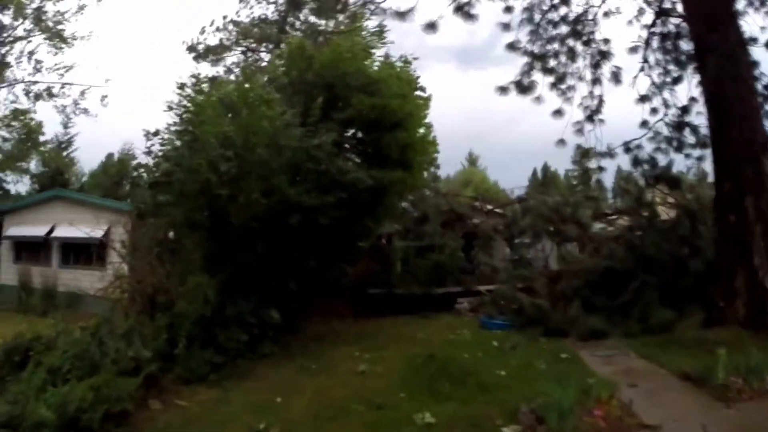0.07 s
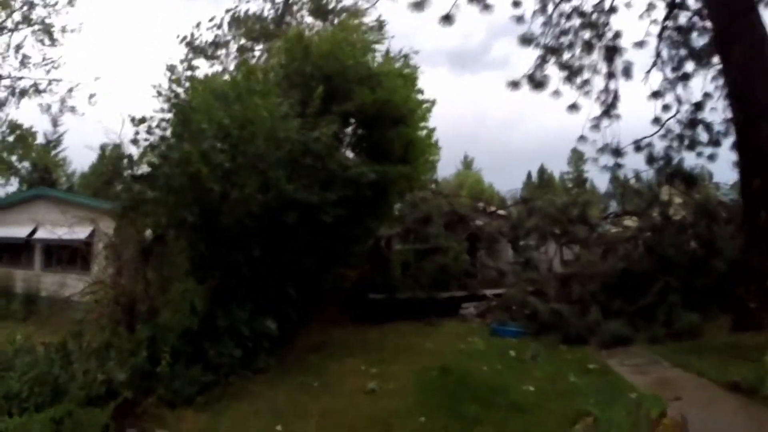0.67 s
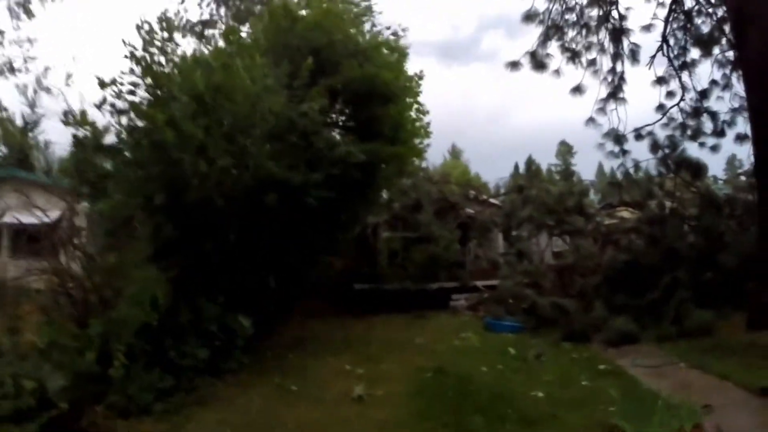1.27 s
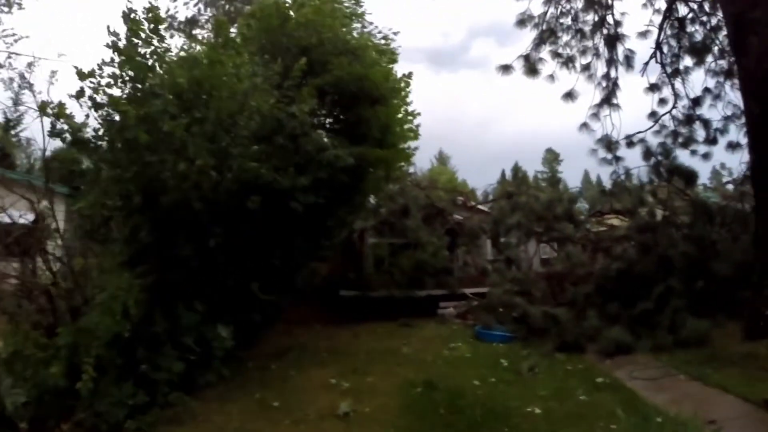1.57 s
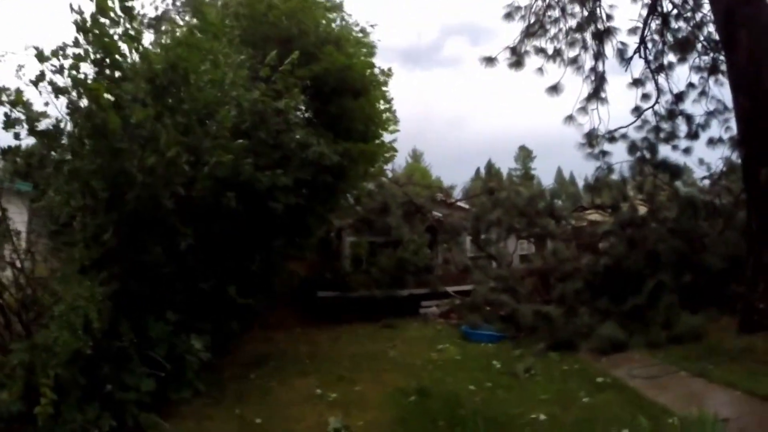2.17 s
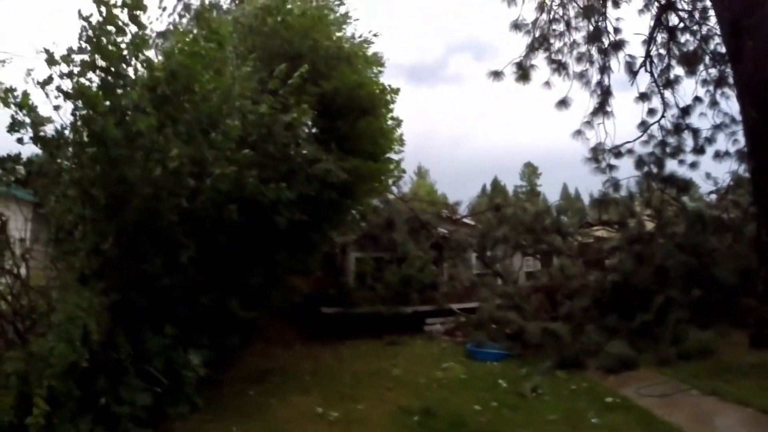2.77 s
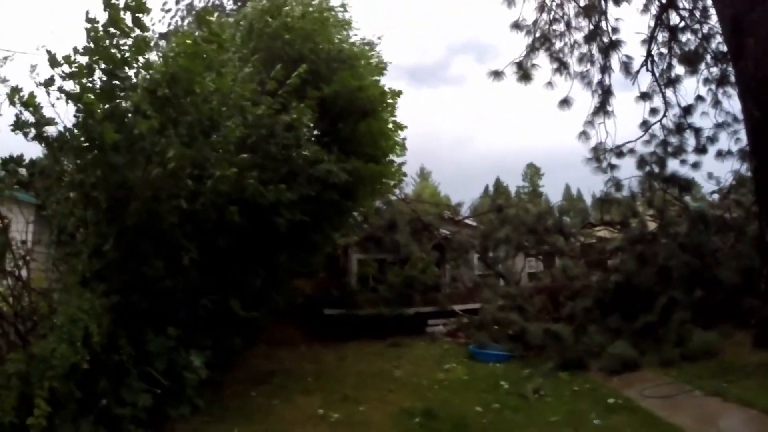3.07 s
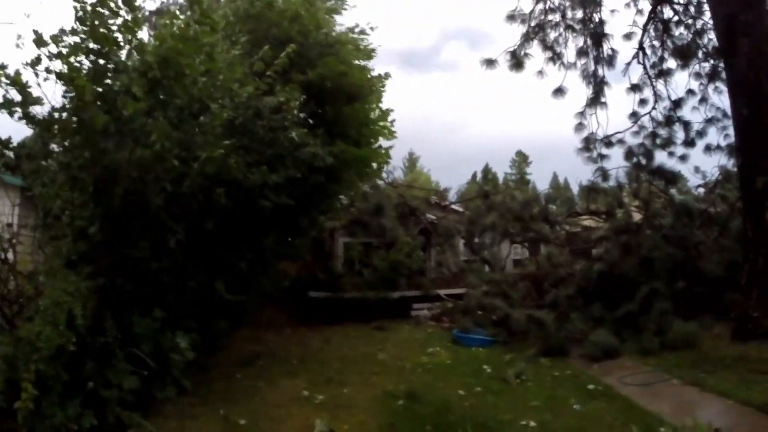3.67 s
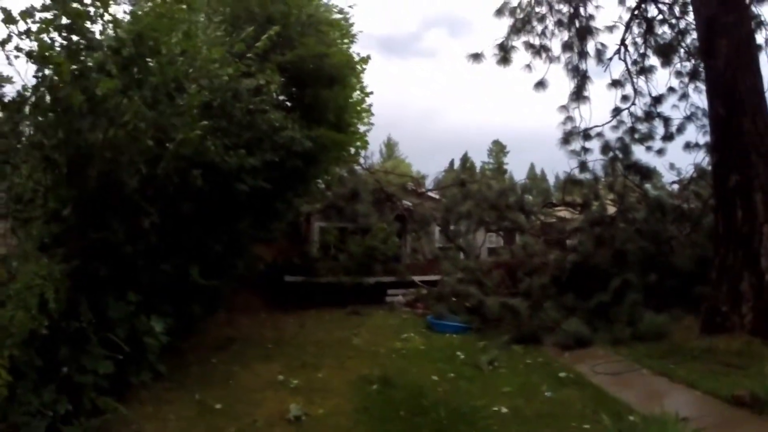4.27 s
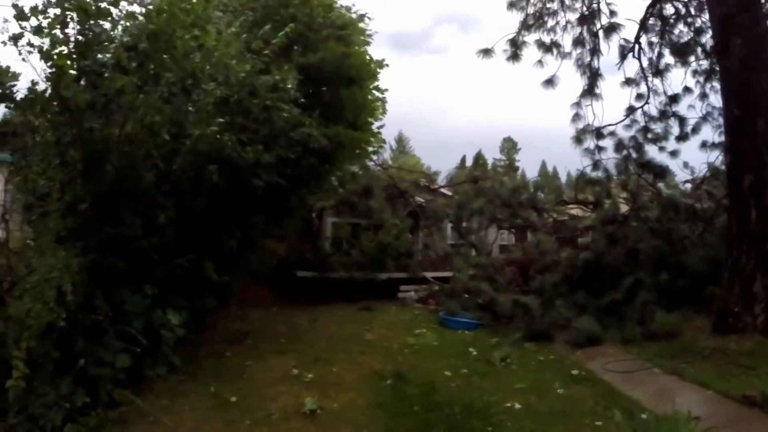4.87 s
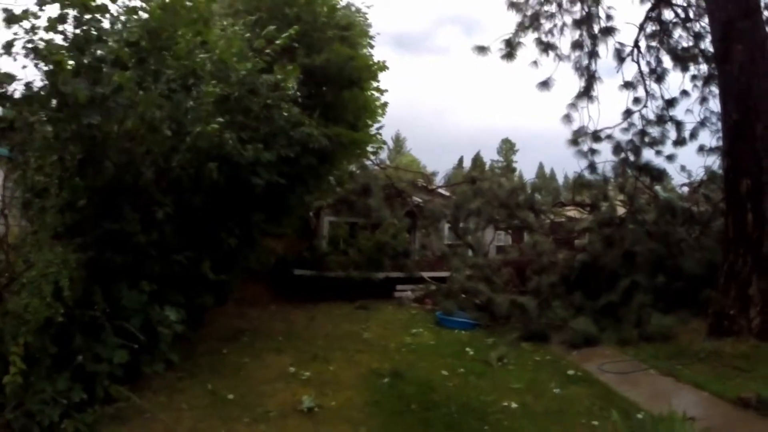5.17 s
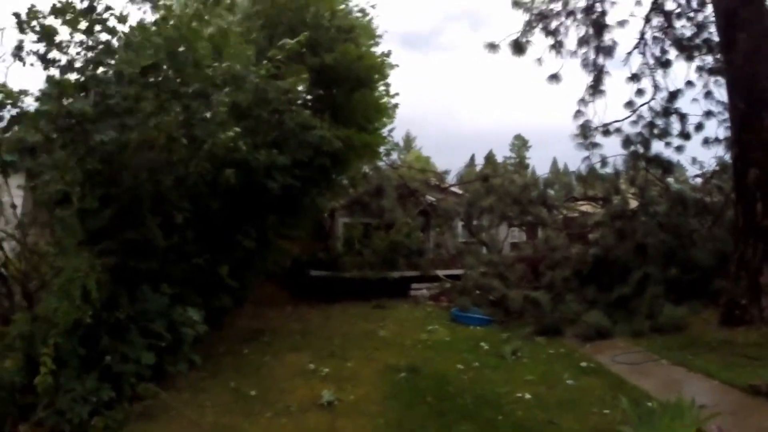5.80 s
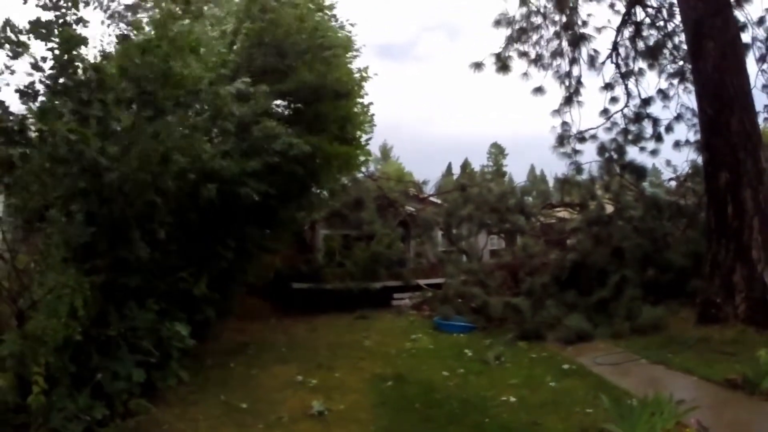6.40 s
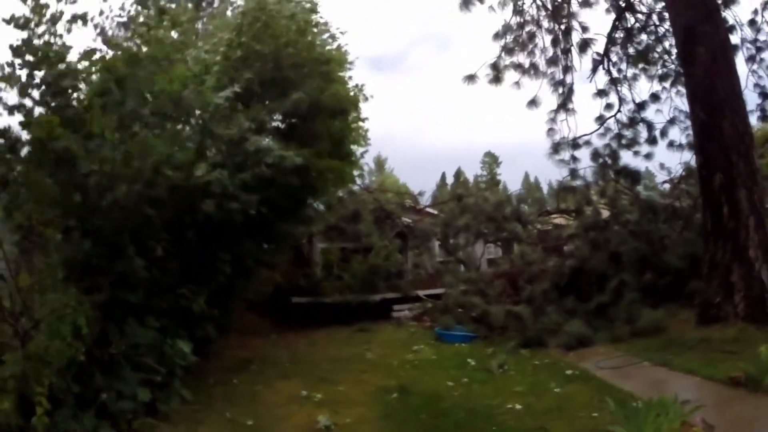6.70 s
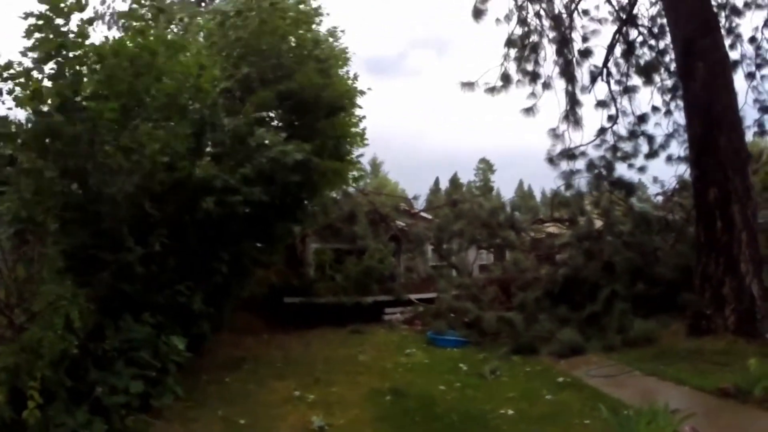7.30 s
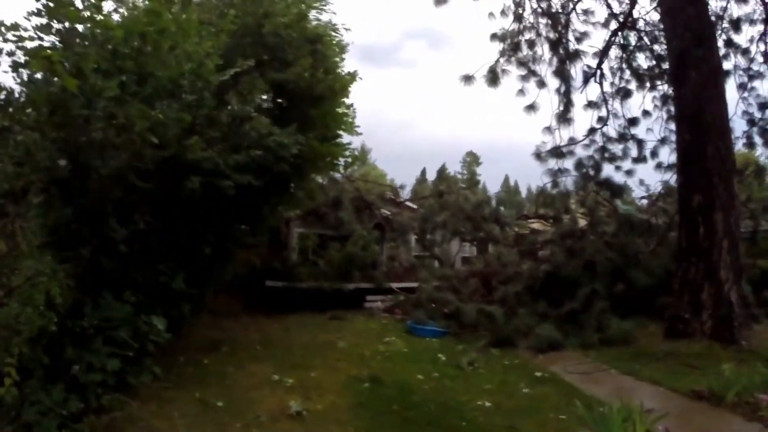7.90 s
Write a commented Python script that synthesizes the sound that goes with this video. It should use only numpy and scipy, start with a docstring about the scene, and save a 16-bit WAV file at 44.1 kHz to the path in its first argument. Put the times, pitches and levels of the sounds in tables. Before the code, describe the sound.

A soft breeze moves through pines and leafy bushes in a backyard, swelling toward the middle and then easing, over a low wind rumble. Dull handling thumps hit the hand-held microphone, clustered at the start and again later, with a few small plastic ticks. Midway a far engine faintly revs once, and an insect rasps very faintly now and then.

```python
"""Breeze in a backyard

A breeze swells and fades in pines and leafy bushes, heard by a hand-held camera with one microphone.
The hand bumps the camera body, which booms softly, and its plastic casing ticks a few times.
Far off an engine rises and falls once, and an insect rasps faintly in short groups."""
import sys
import numpy as np
from scipy import signal
from scipy.fft import rfft, irfft, next_fast_len
from scipy.io import wavfile

SR = 44100
rng = np.random.default_rng(int(sys.argv[2]) if len(sys.argv) > 2 else 0)


def to_wav(sig):
    """Store sig (one row per channel, or 1-D mono) as 16-bit WAV at the path in sys.argv[1].

    Samples outside -1..1 are clipped; the rate is SR.
    """
    pcm = np.clip(np.atleast_2d(sig), -1, 1) * 32767
    pcm = np.round(pcm).astype(np.int16)
    wavfile.write(sys.argv[1], SR, pcm.T)  # frames by channels


N = 355005

# one gust swells and fades in the pines: (time [s], wind strength [dB])
PINE_GUST = [(0.0, -7), (2.3, -3.5), (2.8, -1), (3.8, 0.7), (6.2, -2), (7.3, -3.5), (8.05, -6)]
# pitches that the microphone's housing makes louder, or quieter where the boost is negative: (centre [Hz],
# width [Hz], boost [dB])
HOUSING_PEAKS = [(1408, 175, 5.5), (2137, 500, 6), (2326, 106, -3.5), (3360, 130, 2.5), (4405, 350, 5.5),
                 (5000, 160, 1.5), (5810, 520, 6.5)]


def pines(level_db=-53.0, flutter_db=0.5):
    """Air rushes through pine needles: a smooth sigh that follows the gust."""
    # tone of the needles: (frequency [Hz], level [dB])
    needle_tone = [(700, -21.5), (1300, -12.5), (1800, -5.5), (2150, 1.5), (2600, -2.5), (3100, -6),
                   (3700, -18.5), (6000, -20.5), (9000, -30.5), (15000, -56)]
    sigh = coloured(rng.standard_normal(N), needle_tone, HOUSING_PEAKS)
    return sigh * gain_of(follow(PINE_GUST) + level_db + flutter_db * drift(18))


def leaves(level_db=-60.0, taps_per_s=900, tap_share=0.37, flutter_db=0.6):
    """Countless leaves brush together; the nearer ones tap separately."""
    # tone of the leaves: (frequency [Hz], level [dB])
    leaf_tone = [(900, -9), (1400, 0.5), (2000, -3.5), (2800, -2), (3700, -2), (4500, 0), (5200, -2),
                 (6200, 0), (7200, -5.5), (8200, -11.5), (11000, -16.5), (15000, -24)]
    # the gust reaches the near bushes sooner and stays longer: (time [s], wind strength [dB])
    bush_gust = [(0.0, -4), (0.9, -3), (2.3, 0.5), (5.4, -0.8), (6.1, 0), (7.0, -2.5), (8.05, -1.5)]
    taps = rng.standard_normal(N) * (rng.random(N) < taps_per_s / SR)
    rustle = coloured(rng.standard_normal(N) + tap_share * evened(taps), leaf_tone, HOUSING_PEAKS)
    return rustle * gain_of(follow(bush_gust) + level_db + flutter_db * drift(20))


def hand_bumps(nudges_per_s=1.6, nudge_db=-46, spread_db=2.0):
    """The hand bumps the camera firmly, and the fingers nudge it lightly at random moments."""
    # (time [s], level [dB], hardness [dB per octave], grip [factor on the pitch])
    firm_bumps = [(0.072, -31, -4, 1.07), (0.189, -38.5, 0, 1.02), (0.94, -40.5, 1, 1.04),
                  (1.116, -33.5, 15.5, 0.98), (1.125, -41, -18.5, 1.03), (1.192, -40, -9, 1.01),
                  (1.236, -34, -4, 1.01), (1.346, -39, 3, 1.0), (1.492, -37.5, 0, 1.02),
                  (2.124, -34.5, -5, 0.93), (2.817, -36.5, 0, 0.99), (5.681, -32.5, -2, 0.97),
                  (5.741, -38, -6, 0.98), (5.847, -35.5, -2, 0.96), (5.95, -38, -4, 0.96),
                  (7.5, -37.5, 7, 1.01), (7.888, -40.5, 0, 0.87)]
    out = np.zeros(N)
    for at_s, level_db, hardness_db, grip in firm_bumps:
        add(out, at_s, camera_boom(level_db, hardness_db, grip))
    for when, force in rng.random((round(nudges_per_s * N / SR), 2)):
        level_db = nudge_db + spread_db * (2 * force - 1)
        add(out, when * N / SR, camera_boom(level_db, hardness_db=-3.5, grip=1))
    return out


def camera_boom(level_db, hardness_db, grip, contact_s=0.0036):
    """The camera rings: soft pushes favour its lowest note, hard knocks the higher ones."""
    # notes of the camera body: (pitch [Hz], level [dB], time to fade by 60 dB [s])
    body_notes = [(40.7, -13.5, 0.42), (107.3, 0, 0.27), (170, -11, 0.091), (252, -30, .06),
                  (556, -44, 0.035)]
    main_hz = body_notes[1][0]
    struck = [(hz * grip, db + hardness_db * np.log2(hz / main_hz), fade_s)
              for hz, db, fade_s in body_notes]
    body = ring(struck, seconds=0.5)
    cushion = 1 - np.exp(-(np.arange(len(body)) / SR / contact_s) ** 2)  # skin softens the start
    return gain_of(level_db) * body * cushion


def casing_ticks():
    """Tiny slips make the plastic casing ring, each within its own range of pitches."""
    # notes of the casing: (pitch [Hz], level [dB], time to fade by 60 dB [s])
    casing_notes = [(2080, -12, 0.017), (2330, -6.5, .014), (2780, 2.5, 0.0055), (3700, -8, 0.0028),
                    (7100, -7.5, .003), (9800, -11, .002)]
    # slips of the casing: (time [s], level [dB], lowest pitch [Hz], highest pitch [Hz])
    slips = [(0.4093, -32.5, 1200, 2280), (1.704, -43, 3500, 8000), (3.669, -41, 6500, 11500),
             (5.2053, -41, 6500, 11000), (6.2174, -28.3, 2300, 10600)]
    out = np.zeros(N)
    for at_s, level_db, low_hz, high_hz in slips:
        band = signal.butter(3, [low_hz, high_hz], "bandpass", fs=SR, output="sos")
        add(out, at_s, gain_of(level_db) * signal.sosfilt(band, ring(casing_notes, seconds=0.04)))
    return out


def finger_brush(at_s=1.464, stroke_s=0.015, level_db=-52):
    """One short, soft scrape of skin on plastic."""
    # tone of the scrape: (frequency [Hz], level [dB])
    scrape_tone = [(1000, -15), (2200, 4), (4400, 2), (6000, -6), (8000, -18), (14000, -28)]
    stroke = np.exp(-((np.arange(N) / SR - at_s) / stroke_s) ** 2)
    return gain_of(level_db) * stroke * coloured(rng.standard_normal(N), scrape_tone, HOUSING_PEAKS)


def far_engine(idle_hz=74.5, rev_hz=97.4, idle_db=-56, rev_boost_db=6):
    """A far engine revs once, louder as it speeds up; only its two lowest tones carry this far."""
    start_s, end_s, fade_s = 3.16, 4.54, 0.12
    rev_at_s, rise_s, fall_s = 4.15, 0.38, 0.26
    t = np.arange(N) / SR
    throttle = np.exp(-((t - rev_at_s) / np.where(t < rev_at_s, rise_s, fall_s)) ** 2)
    hz = (idle_hz + (rev_hz - idle_hz) * throttle) * (1 + 0.025 * drift(25))  # the pitch wavers
    phase = 2 * np.pi * np.cumsum(hz) / SR
    drone = evened(np.sin(phase) + gain_of(-16) * np.sin(2 * phase))
    fade = np.clip(np.minimum(t - start_s, end_s - t) / fade_s, 0, 1)
    return drone * fade * gain_of(idle_db + rev_boost_db * throttle - 0.5 * drift(18))


def insect(gap_s=0.0385, stroke_s=0.014, spread_db=0.4):
    """An insect rasps in short, dry, evenly paced strokes, three or four to a call."""
    # its calls: (start [s], length [s], level [dB])
    calls = [(0.838, 0.135, -70), (2.294, 0.095, -69), (4.89, 0.135, -69.5), (5.872, 0.135, -69)]
    # tone of the rasp: (frequency [Hz], level [dB])
    rasp_tone = [(3000, -33), (6500, 3), (8500, -3), (10000, -2), (11200, -1), (12300, -7.5), (15000, -14)]
    t, strokes = np.arange(N) / SR, np.zeros(N)
    for start_s, length_s, level_db in calls:
        for at_s in np.arange(start_s, start_s + length_s, gap_s):
            strength = gain_of(level_db + spread_db * rng.standard_normal())
            strokes += strength * np.exp(-((t - at_s) / stroke_s) ** 2)
    return strokes * coloured(rng.standard_normal(N), rasp_tone)


def distant_wash(level_db=-55.0, gust_share=0.19):
    """The far neighbourhood blurs into a soft noise that swells a little with the gust."""
    # tone of the wash: (frequency [Hz], level [dB])
    wash_tone = [(60, 1.5), (160, 4), (260, 3.5), (400, .5), (800, -1), (1100, -1), (1500, 0), (2100, -6.5),
                 (3500, -18), (8000, -36)]
    wash = coloured(rng.standard_normal(N), wash_tone, HOUSING_PEAKS)
    return wash * gain_of(level_db + gust_share * follow(PINE_GUST))


def wind_rumble(buffet_db=1.9):
    """Wind flows round the camera body with a low, uneven rumble."""
    # tone of the rumble: (frequency [Hz], level [dB])
    rumble_tone = [(8, -3), (22, 1.5), (32, -1.5), (45, 0.5), (60, -2.5), (80, -11.5), (106, -2),
                   (135, -13), (200, -18), (400, -28.5), (1500, -60)]
    # wind at the camera: (time [s], level [dB])
    draught = [(0.0, -48.5), (1.7, -50.5), (3.8, -48), (5.4, -52), (8.05, -53)]
    rumble = coloured(rng.standard_normal(N), rumble_tone)
    return rumble * gain_of(follow(draught) + buffet_db * drift(8))


def microphone_hiss(level_db=-74):
    """The microphone adds its own faint, steady hiss."""
    # tone of the hiss: (frequency [Hz], level [dB])
    hiss_tone = [(100, 0), (7000, 2), (10000, -0.17), (15000, -1.1)]
    return gain_of(level_db) * coloured(rng.standard_normal(N), hiss_tone)


def gain_of(db):
    """Turns decibels into a number to multiply by."""
    return 10 ** (np.asarray(db) / 20)


def evened(x):
    """Scales a signal to an average strength (rms) of one."""
    return x / np.sqrt(np.mean(x ** 2) + 1e-20)


def follow(rows):
    """Joins (time, value) points with straight lines, giving a value for every sample."""
    return np.interp(np.arange(N) / SR, *np.transpose(rows))


def add(mix, at_s, sound):
    """Mixes a sound in at a given time."""
    part = mix[max(round(at_s * SR), 0):][:len(sound)]
    part += sound[:len(part)]


def coloured(x, tone, peaks=()):
    """Shapes a sound with a tone curve and boosted peaks, then scales it to strength one."""
    size = next_fast_len(N)
    hz = np.fft.rfftfreq(size, 1 / SR)
    tone_hz, tone_db = np.transpose(tone)
    db = np.interp(np.log(hz + 1), np.log(tone_hz), tone_db)
    for centre, width, boost_db in peaks:
        db += boost_db / (1 + (2 * (hz - centre) / width) ** 2)
    return evened(irfft(rfft(x, size) * gain_of(db), size)[:N])


def drift(fastest_hz):
    """A random wobble of strength one, made of slow waves added together."""
    t = np.arange(0, N, 200) / SR
    rates = np.geomspace(fastest_hz / 10, fastest_hz, num=24)
    waves = sum(np.sin(2 * np.pi * (hz * t + rng.random())) for hz in rates)
    return np.interp(np.arange(N) / SR, t, evened(waves))


def ring(notes, seconds):
    """A struck object rings with pure tones that die away."""
    t = np.arange(int(seconds * SR)) / SR
    return sum(gain_of(db - 60 * t / fade_s) * np.sin(2 * np.pi * hz * t) for hz, db, fade_s in notes)


def scene():
    """All the sounds meet at one microphone, which feeds both channels."""
    breeze = pines() + leaves()
    background = distant_wash() + wind_rumble() + microphone_hiss()
    mono = breeze + background + casing_ticks() + finger_brush() + far_engine() + insect() + hand_bumps()
    return np.array([mono, mono])


def record(dry, cutoff_hz=15350):
    """The camera cuts off the very highest treble."""
    low_pass = signal.firwin(511, cutoff_hz, window=("kaiser", 9), fs=SR)
    return signal.oaconvolve(dry, low_pass[None], "same")


dry = scene()
out = record(dry)
to_wav(out)
```